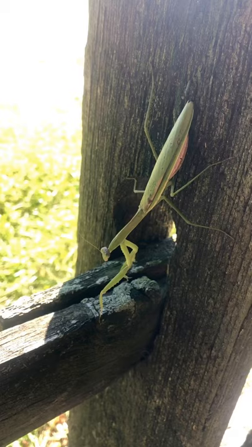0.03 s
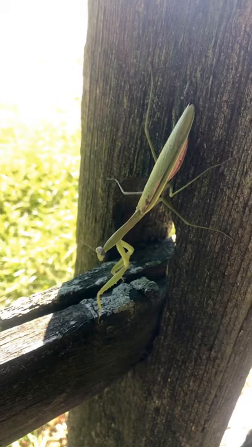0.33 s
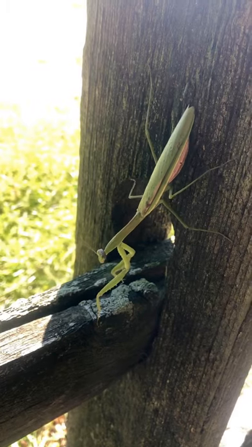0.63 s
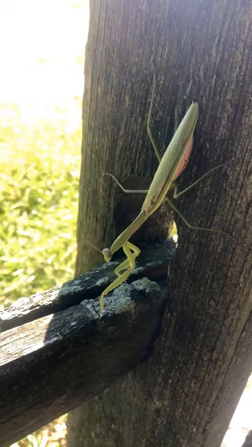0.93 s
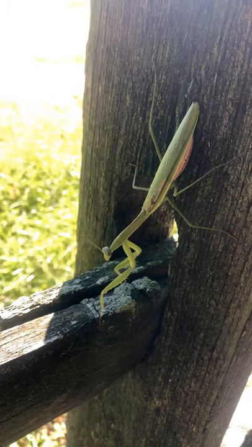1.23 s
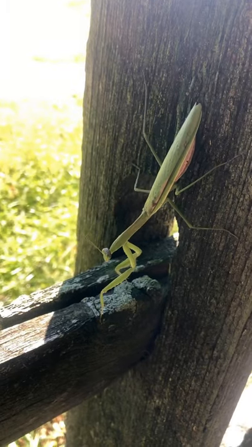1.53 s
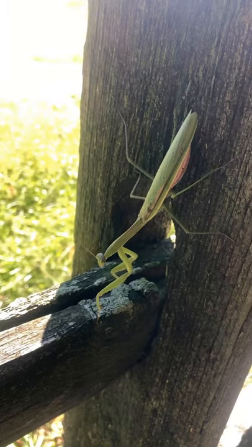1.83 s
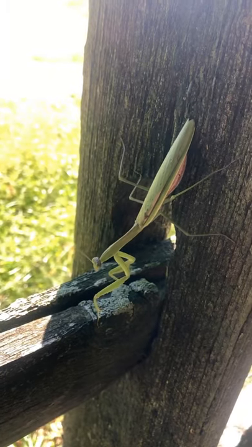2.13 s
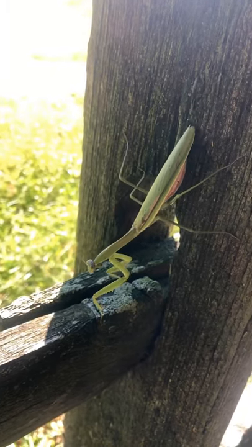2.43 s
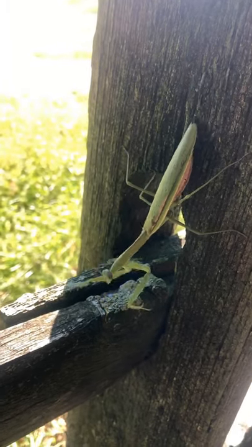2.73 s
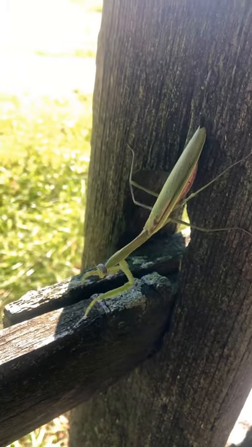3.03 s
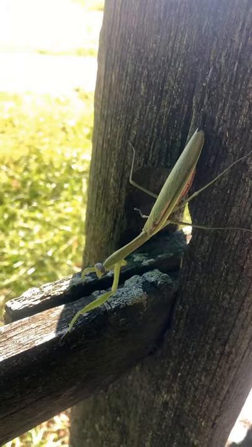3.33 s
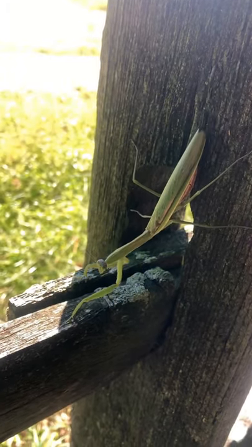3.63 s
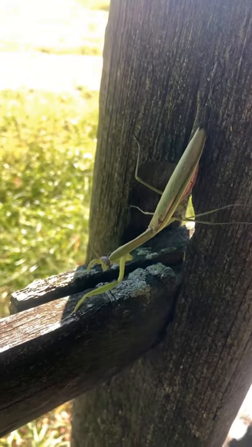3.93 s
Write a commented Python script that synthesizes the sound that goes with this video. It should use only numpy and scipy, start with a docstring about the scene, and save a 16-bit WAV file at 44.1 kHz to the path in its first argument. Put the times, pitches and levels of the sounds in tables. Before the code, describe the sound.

A high chorus of crickets pulses without pause in the open air. Short gusts thump and rumble on the microphone, with a few tiny dry ticks nearby and faint falling whistles from a far bird.

```python
"""Crickets in a breezy meadow

Small crickets chirp near 9 kHz, each chirp a quick run of wing strokes, over a far chorus and
a faint insect sizzle. A field cricket repeats a lower three-note chirp; a distant bird gives
falling whistles. Wind buffets the microphone with thuds, flutter and pops over a low rumble,
and a few dry ticks sound close by in the hiss of open air."""
import sys
import numpy as np
from scipy import signal
from scipy.fft import rfft, irfft, next_fast_len
from scipy.io import wavfile
from scipy.ndimage import uniform_filter1d, map_coordinates

SR = 44100
rng = np.random.default_rng(int(sys.argv[2]) if len(sys.argv) > 2 else 0)


def unload_wav(signal):
    """Save mono or channel-first audio to the path in sys.argv[1] as 16-bit WAV at rate SR, clipped to [-1, 1]."""
    wavfile.write(
        sys.argv[1],
        SR,
        np.round(np.clip(np.atleast_2d(signal).T, -1, 1) * 32767).astype(np.int16),
    )


N = 176400
T = np.arange(N) / SR


def amp(db):
    """Decibels to gain."""
    return 10 ** (np.asarray(db) / 20)


def unit(x):
    """x at rms 1."""
    return x / np.sqrt(np.mean(x ** 2) + 1e-20)


def add(track, start, sound):
    """Mix a sound in at a start time in seconds."""
    i = max(0, round(start * SR))
    track[i:i + len(sound)] += sound[:max(0, N - i)]


def filtered(x, response):
    """EQ x with a gain curve over frequency."""
    size = next_fast_len(N + 8192)
    return irfft(rfft(x, size) * response(np.fft.rfftfreq(size, 1 / SR)), size)[:N]


def noise(colour):
    """Noise of rms 1, coloured by (frequency [Hz], level [dB]) points."""
    hz, db = np.transpose(colour)
    white = rng.standard_normal(N)
    return unit(filtered(white, lambda f: amp(np.interp(np.log(f + 1), np.log(hz), db))))


def wobble(rate):
    """A smooth random curve through `rate` points a second."""
    return map_coordinates(rng.standard_normal(int(N * rate / SR) + 4), [T * rate])


def excerpt(curve, start, samples):
    """A stretch of a looped curve, from a start time in seconds."""
    return curve.take(int(start * SR) + np.arange(samples), mode="wrap")


def stroke(hz, length_s, sag_hz):
    """Envelope and phase of one wing stroke, whose pitch sags as the wing slows."""
    progress = np.arange(int(length_s * SR)) / (length_s * SR)
    pitch = hz - sag_hz * (progress ** 3 - 1 / 8)
    return np.sin(np.pi * progress), 2 * np.pi * (np.cumsum(pitch) / SR + rng.random())


def meadow_echo(x, t60, wet_db):
    """The sound plus its diffuse echo from the grass and trees."""
    t = np.arange(SR // 2) / SR
    tail = rng.standard_normal(len(t)) * amp(-60 * t / t60)
    return x + amp(wet_db) * signal.fftconvolve(x, tail / np.linalg.norm(tail))[:N]


def swell_power(swells, half_width_s, gain_db):
    """Power envelope of overlapping bell-shaped swells."""
    return sum(amp(db + gain_db) ** 2 * np.exp(-((T - at) / half_width_s) ** 2) for at, db in swells)


# Cues for each near cricket, keyed by its pitch [Hz]: (time [s], level [dB])
NEAR_CHIRPS = { 9720: [(.001, -56), (.222, -56), (.478, -53.5), (.720, -55), (.960, -55.5), (1.182, -57),
               (1.418, -58.5), (1.655, -57), (1.902, -56), (2.162, -55.5), (2.425, -56.5), (2.670, -57.5),
               (2.899, -56), (3.155, -55.5), (3.404, -58), (3.654, -56.5), (3.895, -57.5)],
               9600: [(1.050, -59.5), (1.455, -58.5), (1.800, -61.5), (2.060, -61)], 9050: [(0, -53.5),
               (.120, -59.5), (.186, -53), (.326, -58.5), (.373, -53), (.573, -53), (.753, -52.5),
               (.935, -53), (1.104, -54.5), (1.291, -52.5), (1.507, -50.5), (1.722, -50.5), (1.917, -51),
               (2.123, -52), (2.330, -52.5), (2.518, -52.5), (2.712, -53.5), (2.896, -54), (3.079, -51),
               (3.283, -53), (3.488, -51.5), (3.680, -53)], 8870: [(.260, -57.5), (.527, -55), (.774, -57),
               (1.028, -53.5), (1.260, -59), (1.524, -55), (1.788, -58), (1.933, -59), (2.050, -57.5),
               (2.295, -53.5), (2.574, -55), (2.810, -57.5), (3.110, -56), (3.320, -53.5), (3.576, -55.5),
               (3.833, -56)], 8740: [(2.140, -57), (2.375, -55), (2.614, -54), (2.868, -54), (3.360, -55),
               (3.636, -54), (3.923, -56)], 8480: [(.020, -59), (.888, -59), (2.975, -58)]}
# Bright top of the wing scrape: (frequency [Hz], level [dB])
SHEEN_COLOUR = [(9000, -11), (10600, -4), (11500, -7.5), (13000, -17), (15500, -9), (16500, -13)]


def near_crickets(strokes=7, stroke_rate_hz=119, scrape_hz=8500, scrape_width_hz=480):
    """Each chirp is a swelling run of wing strokes: a rasping tone, scrape below it, sheen above."""
    tone, envelope = np.zeros((2, N))
    rasp_rad = .22 * wobble(1400)
    arch_db = -2 * np.linspace(-1, 1, strokes) ** 2  # a chirp is softer at both ends
    chirps = [(at, hz, db) for hz, cues in NEAR_CHIRPS.items() for at, db in cues]
    for at, hz, db in chirps:
        pace_hz = stroke_rate_hz * np.exp(.03 * rng.standard_normal())
        for k, (late, accent, detune) in enumerate(rng.standard_normal((strokes, 3))):
            start = at + k / pace_hz + .0005 * late
            shape, phase = stroke(hz + 45 * detune, length_s=.007, sag_hz=340)
            shape *= amp(db + arch_db[k] + 1.2 * accent)
            phase += excerpt(rasp_rad, start, len(phase))
            add(tone, start, shape * np.sin(phase))
            add(envelope, start, shape)
    white = rng.standard_normal(N)
    scrape = unit(filtered(white, lambda f: 1 / (1 + ((f - scrape_hz) / scrape_width_hz) ** 2) ** 2))
    song = tone + envelope * (amp(-14) * scrape + amp(-24) * noise(SHEEN_COLOUR))
    return meadow_echo(amp(5.4) * song, t60=.05, wet_db=-9)


# Three-note chirps: (time [s], level [dB], first pitch [Hz], second pitch [Hz], third pitch [Hz])
FIELD_CHIRPS = [(0.178, -59.5, 4530, 4630, 4410), (.512, -60.5, 4510, 4550, 4410),
                (.846, -61.5, 4490, 4360, 4580), (1.183, -60.5, 4490, 4600, 4530),
                (1.522, -62, 4520, 4600, 4600), (1.842, -61, 4500, 4570, 4490),
                (2.209, -63, 4580, 4420, 4530), (2.552, -64, 4500, 4400, 4480),
                (2.868, -60.5, 4470, 4420, 4590), (3.204, -60.5, 4510, 4600, 4560),
                (3.540, -59.5, 4490, 4560, 4570), (3.868, -61.5, 4440, 4600, 4600)]


def field_cricket(note_spacing_s=.044, gain_db=-.5, step_db=1):
    """Three rough wing strokes a chirp, each louder and drooping further, with a weak third harmonic."""
    out, rasp_rad = np.zeros(N), .3 * wobble(300)
    for at, db, *pitches in FIELD_CHIRPS:
        for k, hz in enumerate(pitches):
            start = at + k * note_spacing_s
            shape, phase = stroke(hz, length_s=.0264, sag_hz=130 + 90 * k)
            phase += excerpt(rasp_rad, start, len(phase))
            tone = np.sin(phase) + amp(-17) * np.sin(3 * phase)
            add(out, start, amp(db + gain_db + k * step_db) * shape * tone)
    return meadow_echo(out, t60=.6, wet_db=-4)


# Gust cues: (time [s], length [s], thud level [dB], flutter level [dB])
GUST_CUES = [(0, 0.044, -45, -49), (0.113, 0.1, -40.5, -58), (0.237, 0.05, -37.5, -66),
             (0.303, 0.07, -36.5, -40.5), (0.391, .04, -34, -33), (0.423, 0.045, -26, -30),
             (0.629, 0.041, -33, -50), (0.697, 0.019, -38, -42), (0.798, 0.049, -32, -47),
             (0.888, 0.038, -35.5, -49), (1.048, 0.052, -30.5, -35), (1.276, 0.042, -33.5, -36.5),
             (1.373, 0.028, -35, -38.5), (1.44, 0.031, -30.5, -41), (1.504, 0.037, -32, -56),
             (1.632, 0.058, -36, -68), (1.666, 0.057, -33, -37.5), (1.741, 0.047, -33, -43.5),
             (1.847, 0.043, -37, -41), (1.903, 0.044, -37.5, -37), (1.939, 0.073, -32, -32.5),
             (2.036, 0.05, -37.5, -39), (2.099, 0.045, -31, -40.5), (2.245, 0.024, -42, -35.5),
             (2.277, 0.025, -35, -54), (2.366, 0.069, -32.5, -34), (2.421, 0.026, -32, -33),
             (2.438, 0.05, -38.5, -45.5), (2.556, 0.049, -36, -39.5), (2.63, 0.031, -36, -43),
             (2.766, 0.043, -34, -40), (2.837, 0.071, -29.5, -39), (3.006, 0.05, -38, -38.5),
             (3.069, 0.1, -36.5, -52), (3.209, 0.084, -35.5, -42), (3.297, 0.04, -37.5, -36.5),
             (3.369, 0.013, -53, -38), (3.417, 0.028, -37.5, -39), (3.472, 0.016, -36, -40.5),
             (3.916, 0.074, -35, -39)]
# Bass weight of a gust, and the flutter above it: (frequency [Hz], level [dB])
THUD_COLOUR = [(20, -43), (32, -18), (48, -5), (75, 1), (120, -3.5), (180, -7.5), (280, -17.5), (500, -45),
               (1000, -78)]
FLUTTER_COLOUR = [(60, -25), (140, 7), (220, 5), (330, 0.5), (480, -4), (620, -16.5), (800, -29),
                  (1200, -57.5), (2500, -111)]


def wind_gusts(attack_s=.0033, release_s=.0071):
    """Short gusts hit the microphone, each a low thud with a lumpy flutter on top."""
    thud, flutter = np.zeros((2, N))
    for start, length, thud_db, flutter_db in GUST_CUES:
        shape = np.exp(np.minimum(T - start, 0) / attack_s - np.maximum(T - start - length, 0) / release_s)
        thud = np.maximum(thud, amp(thud_db) * shape)
        flutter = np.maximum(flutter, amp(flutter_db) * shape)
    lumps = unit(amp(4.6 * wobble(130)))
    thud *= eddies(THUD_COLOUR, smooth_s=.0578)
    flutter *= lumps * eddies(FLUTTER_COLOUR, smooth_s=.0222)
    return amp(-1.47) * thud + amp(-6.5) * flutter


def eddies(colour, smooth_s):
    """Turbulent noise with its slow swells evened out."""
    turbulence = noise(colour)
    local_power = np.abs(uniform_filter1d(turbulence ** 2, int(smooth_s * SR)))
    return turbulence / np.sqrt(local_power + .019)


# Wind pop cues: (time [s], level [dB], starting pitch [Hz])
POP_CUES = [(0.434, -27.5, 600), (0.442, -30.5, 676), (0.804, -26, 540), (1.094, -38, 610),
            (1.271, -38, 563), (1.299, -31.5, 630), (1.375, -37, 596), (1.448, -34.5, 600),
            (1.516, -35.5, 630), (1.676, -37, 485), (1.763, -32.5, 808), (1.776, -34.5, 545),
            (1.853, -31.5, 690), (1.868, -33.5, 685), (1.902, -42, 720), (1.935, -33.5, 650),
            (1.961, -32.5, 560), (1.978, -36, 520), (2.012, -39.5, 730), (2.041, -39.5, 620),
            (2.108, -28, 504), (2.277, -31, 667), (2.374, -27, 520), (2.418, -26, 560), (2.646, -36.5, 540),
            (2.765, -38, 560), (2.838, -36, 650), (2.85, -28.5, 376), (2.882, -34.5, 640),
            (2.891, -31, 525), (3.005, -36.5, 555), (3.103, -29.5, 602), (3.214, -38, 440),
            (3.316, -38, 567), (3.367, -39, 540)]


def wind_pops(rise_s=.0032, onset_s=.00065, sag_s=.00496, end_hz=123.6, lowpass_hz=834):
    """The sharpest eddies strike the microphone as short, dull pops that sink in pitch."""
    out, t = np.zeros(N), np.arange(SR // 25) / SR
    shape = t / rise_s * np.exp(1 - t / rise_s) * (1 - np.exp(-t / onset_s))
    for start, db, hz in POP_CUES:
        pitch = end_hz + (hz - end_hz) * np.exp(-t / sag_s)
        phase = 2 * np.pi * (np.cumsum(pitch) / SR + rng.random())
        add(out, start, amp(db + .5) * shape * np.sin(phase))
    return filtered(out, lambda f: 1 / np.sqrt(1 + (f / lowpass_hz) ** 8))


# Whistle cues: (time [s], length [s], pitch [Hz], fall [Hz], level [dB])
WHISTLE_CUES = [(.755, .295, 3705, 260, -62.5), (2.812, .315, 3730, 440, -60),
                (3.63, .27, 3640, 420, -66.5), (.81, .26, 2730, 150, -73), (3.565, .33, 2740, 270, -69)]


def bird(scoop_hz=400, scoop_s=.018, chip_at_s=2.658):
    """A distant bird: thin, wavering whistles that scoop up and slide down, and one short chip."""
    out, waver_hz = np.zeros(N), 16 * wobble(130)
    for start, length, hz, fall_hz, db in WHISTLE_CUES:
        t = np.arange(int(length * SR)) / SR
        progress = t / length
        pitch = hz - fall_hz * progress - scoop_hz * np.exp(-t / scoop_s)
        pitch += np.interp(start + t, T, waver_hz)
        fade_db = 3.8 * progress
        dip_db = 3 * np.exp(-((progress - .61) / .13) ** 2)  # ebbs past halfway, then swells again
        shape = signal.windows.tukey(len(t), .3) * amp(db + 1 - fade_db - dip_db)
        add(out, start, shape * np.sin(2 * np.pi * np.cumsum(pitch) / SR))
    shape, phase = stroke(4020, length_s=.024, sag_hz=260)  # the chip droops like a wing stroke
    add(out, chip_at_s, amp(-60) * shape * np.sin(phase))
    flicker = amp(1.6 * wobble(70))
    return meadow_echo(out * flicker, t60=.8, wet_db=-4)


# Tick cues: (time [s], level [dB])
TICK_CUES = [(0.1925, -58), (0.2364, -50), (0.7337, -55), (0.8485, -53), (1.3713, -53), (1.951, -48),
             (2.6898, -56)]


def ticks(decay_s=.0016):
    """Tiny dry clicks close by, each a snap of bright noise."""
    envelope, t = np.zeros(N), np.arange(SR // 50) / SR
    for start, db in TICK_CUES:
        add(envelope, start, amp(db - 1) * np.exp(-t / decay_s))
    return envelope * noise([(1000, -33), (4000, 4), (9000, -2), (13000, 2), (15500, 4), (17000, -12)])


# Swells where distant crickets chirp together: (time [s], level [dB])
CHORUS_SWELLS = [(.03, -60.5), (.28, -59), (.38, -66), (.55, -60), (.79, -56), (.92, -59), (1.04, -60),
                 (1.13, -55), (1.299, -54), (1.545, -57), (1.68, -59), (1.8, -56.5), (1.96, -63),
                 (2.08, -63), (2.16, -60), (2.335, -58), (2.61, -60), (2.85, -56), (2.93, -57), (3.12, -55),
                 (3.35, -58), (3.54, -55.5), (3.66, -66), (3.87, -53.5)]
# The band they sing in: (frequency [Hz], level [dB])
CHORUS_COLOUR = [(6000, -45), (7100, -18), (7700, -9), (8400, 0), (8800, 0), (9300, -7), (9750, -8),
                 (10100, -22), (12000, -40)]


def far_chorus(floor_db=-63.3):
    """Many distant crickets blur into a flickering band that swells and ebbs."""
    power = amp(floor_db) ** 2 + swell_power(CHORUS_SWELLS, half_width_s=.037, gain_db=-3.3)
    return np.sqrt(power) * unit(noise(CHORUS_COLOUR) * amp(.89 * wobble(230)))


# Sizzle pulses: (time [s], level [dB])
SIZZLE_PULSES = [(.035, -76), (.165, -78), (.36, -74.5), (.53, -78), (.61, -77), (.79, -74), (.90, -76),
                 (1.08, -76.5), (1.31, -75), (1.53, -72.5), (1.76, -76), (1.87, -75.5), (2.07, -74.5),
                 (2.17, -74.5), (2.34, -73), (2.5, -75), (2.61, -74), (2.83, -77), (2.94, -77), (3.1, -78),
                 (3.32, -74.5), (3.57, -75), (3.86, -74.5)]
# Their thin top-end band: (frequency [Hz], level [dB])
SIZZLE_BAND = [(10000, -30), (13000, -19), (14500, -12), (15200, -6), (15700, -1), (16200, -10)]


def insect_sizzle(grain_db=2.5):
    """Faint, grainy insect pulses at the very top of hearing."""
    power = swell_power(SIZZLE_PULSES, half_width_s=.044, gain_db=1.5)
    return np.sqrt(power) * unit(noise(SIZZLE_BAND) * amp(grain_db * wobble(240)))


# Fader ride of the wind bed: (time [s], level [dB])
RUMBLE_RIDE = [(0, -50.5), (.5, -44.5), (1.2, -45), (2.2, -46), (3.45, -43), (3.52, -53.5), (3.87, -52),
               (4, -44)]
# Its bass-heavy band: (frequency [Hz], level [dB])
RUMBLE_BAND = [(20, -44), (50, -0.5), (85, 1.5), (150, -5.5), (250, -15), (400, -28), (800, -45),
               (2000, -72)]


def wind_rumble():
    """Unbroken wind lays a low bed under the gusts."""
    return amp(np.interp(T, *np.transpose(RUMBLE_RIDE))) * noise(RUMBLE_BAND)


# Open-air tone: (frequency [Hz], level [dB])
AIR_COLOUR = [(100, 1), (500, 2), (1000, 1.5), (1500, -1), (2200, -4.5), (3300, -3.5), (4500, -7.5),
              (6300, -10.5), (10000, -9.5), (12000, -17.5), (14000, -17.5), (15500, -16.5)]


def open_air():
    """A soft, even hiss behind everything."""
    return amp(-61) * noise(AIR_COLOUR)


def scene():
    """Insects, bird, wind, ticks and air in one mono mix."""
    wildlife = near_crickets() + far_chorus() + insect_sizzle() + field_cricket() + bird()
    wind = wind_gusts() + wind_pops() + wind_rumble()
    return (wildlife + wind + ticks() + open_air())[None]


def record(dry):
    """The microphone sheds the deepest bass and keeps nothing above its band limit."""
    low_cut_hz, top_hz = 32.6, 15800
    return filtered(dry[0], lambda f: (f < top_hz) * (1 - 1 / (1 + (f / low_cut_hz) ** 4)))[None]


dry = scene()
out = record(dry)
unload_wav(out)
```